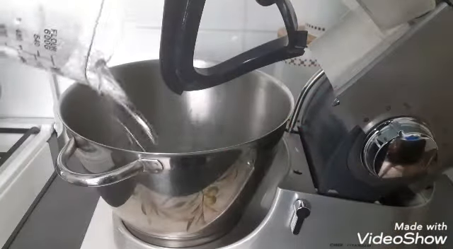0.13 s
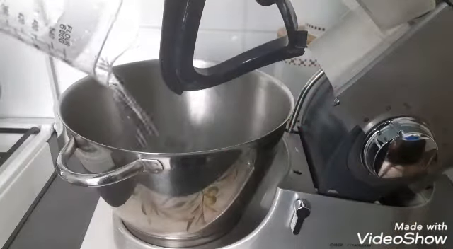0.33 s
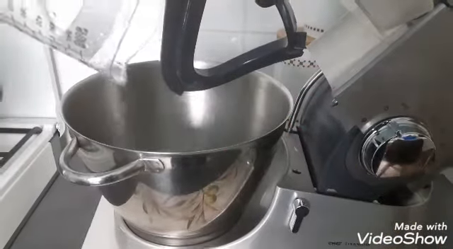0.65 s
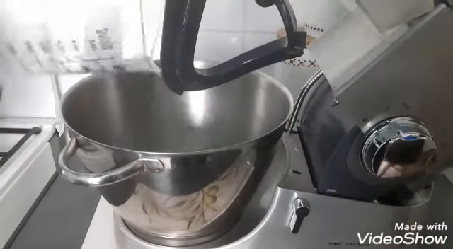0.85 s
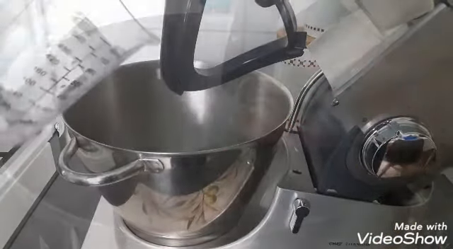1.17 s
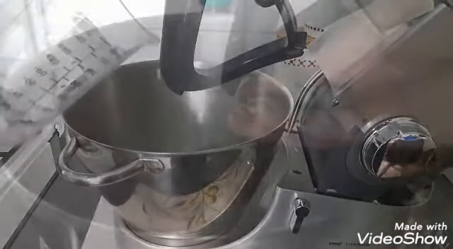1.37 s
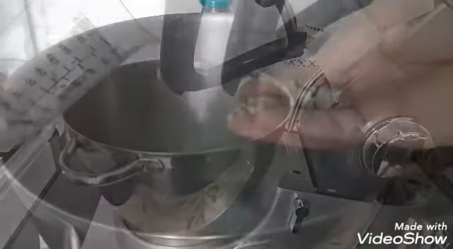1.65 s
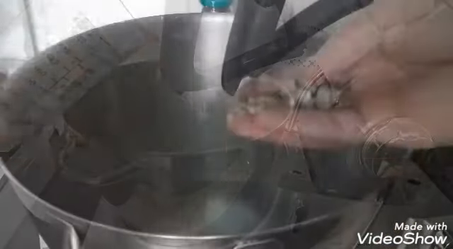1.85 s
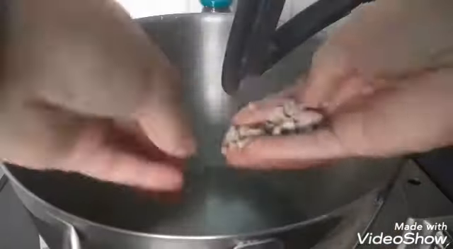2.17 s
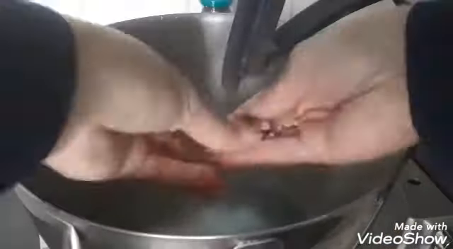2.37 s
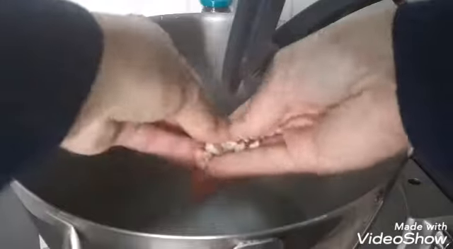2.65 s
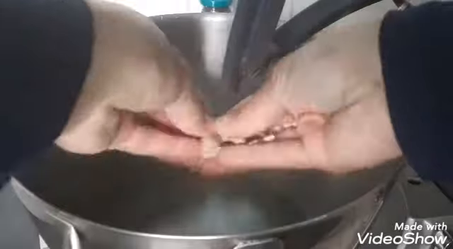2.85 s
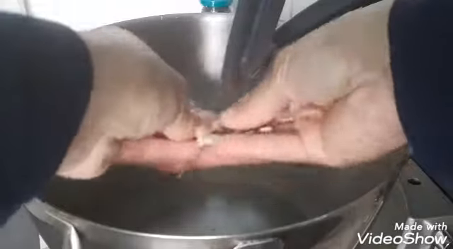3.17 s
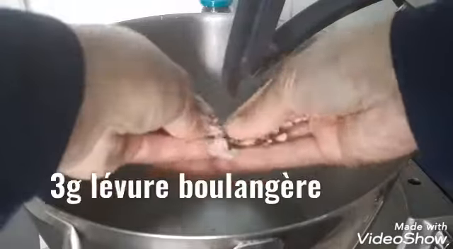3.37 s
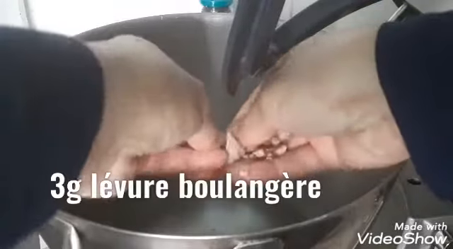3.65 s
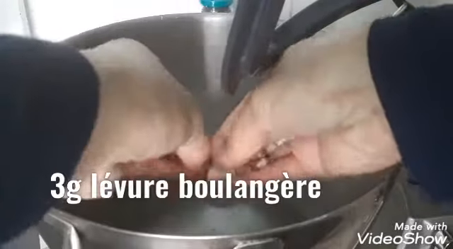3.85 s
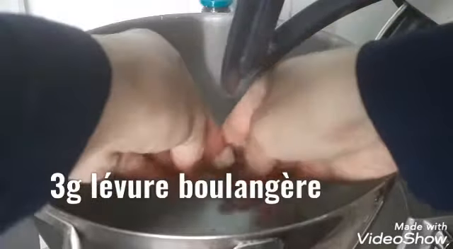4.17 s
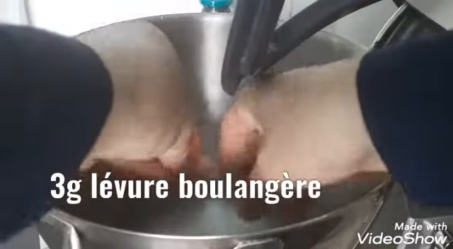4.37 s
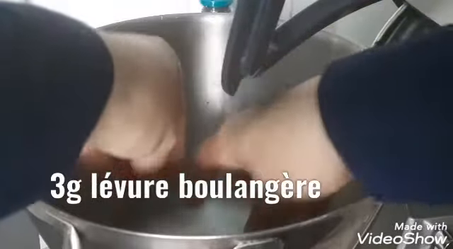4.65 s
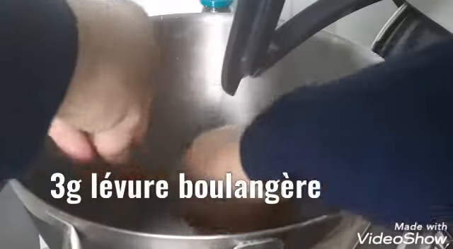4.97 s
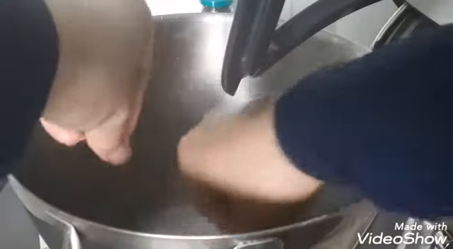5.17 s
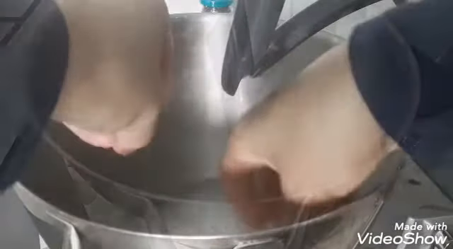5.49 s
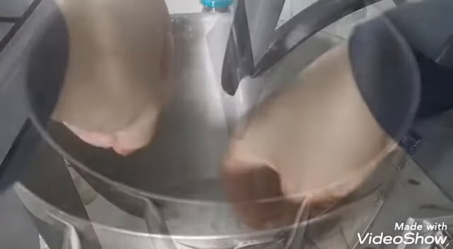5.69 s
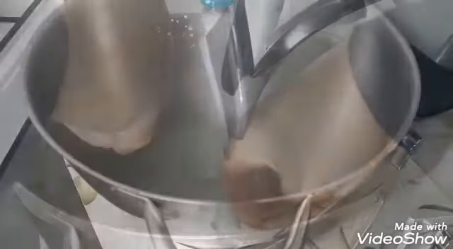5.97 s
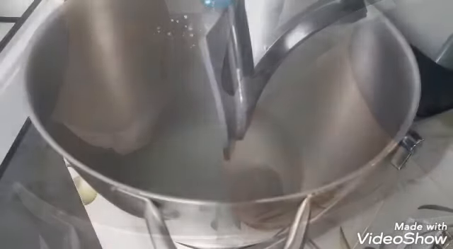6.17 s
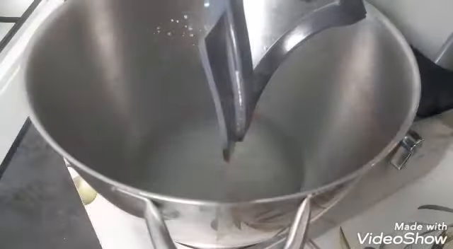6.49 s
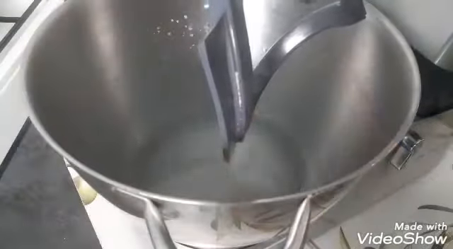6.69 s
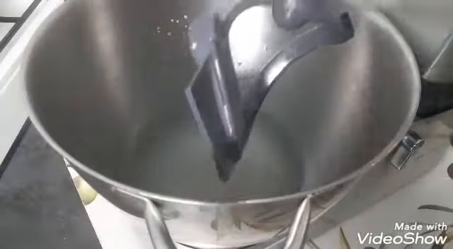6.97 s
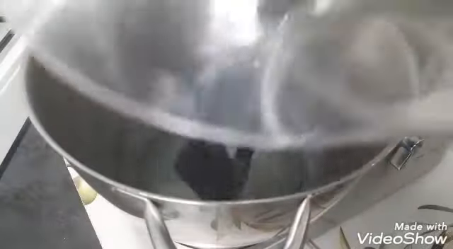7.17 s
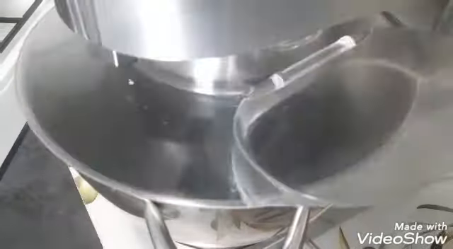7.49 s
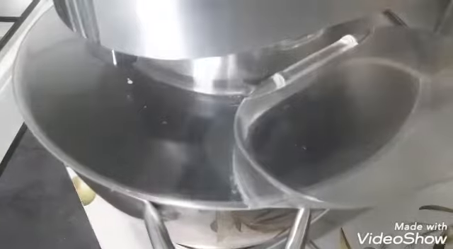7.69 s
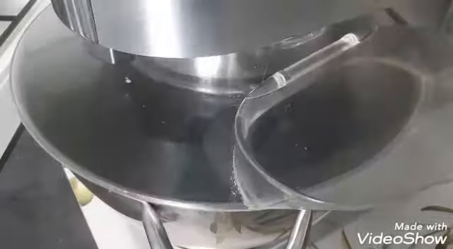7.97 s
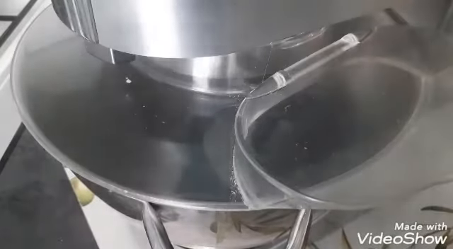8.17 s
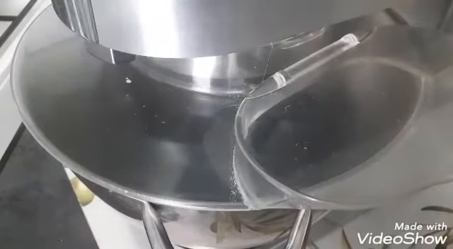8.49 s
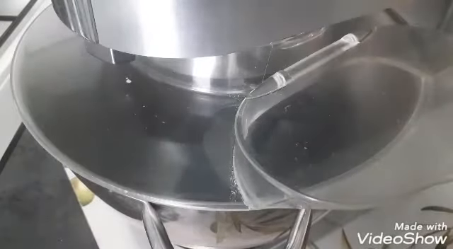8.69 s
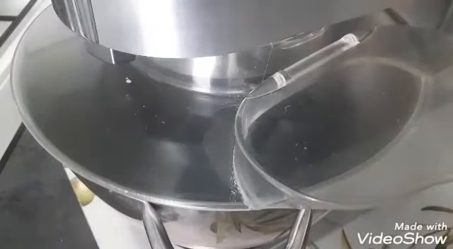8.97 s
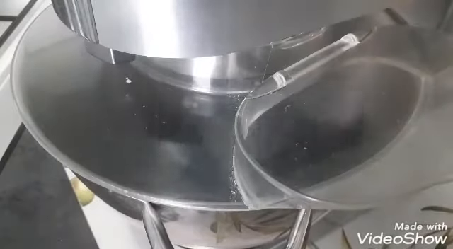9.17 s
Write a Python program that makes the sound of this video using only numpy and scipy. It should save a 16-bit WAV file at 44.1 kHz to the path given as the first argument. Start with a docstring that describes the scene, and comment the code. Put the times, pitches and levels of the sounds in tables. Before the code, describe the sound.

Quiet kitchen hum with thinning water and tiny crumb ticks, then a scraping mixer head slams locked, a switch clicks and the motor whines, sloshing water.

```python
"""Stand mixer over water and yeast

A kitchen hums as filtered noise and a steady tone, joined later by a low mains drone. Water fizzes into a steel
bowl as random clicks; fingers rub and tick as grains and short bursts, crumbs strike steel modes or trap chirping
bubbles. The head's hinge scrapes by stick and slip and groans, its latch knocks excite decaying modes, and the
switch snaps as a resonant burst. The motor whines on multiples of its rotor rate, rumbles and rattles, and its
hook stirs the water."""
import sys
import numpy as np
from scipy import signal
from scipy.fft import rfft, irfft
from scipy.io import wavfile
from scipy.ndimage import uniform_filter1d

SR = 44100
rng = np.random.default_rng(int(sys.argv[2]) if len(sys.argv) > 2 else 0)


def master(y):
    """Save y as 16-bit WAV."""
    cut = np.clip(np.atleast_2d(y).T, -1, 1)
    pcm = np.round(cut * 32767)  # scale
    wavfile.write(sys.argv[1], SR, pcm.astype(np.int16))


N = 411894
TIME = np.arange(N) / SR
AGE = TIME[:SR]  # time since a blow, one second long
MAINS_HZ = 50.05
CUT_FROM_S, CUT_TO_S = 5.338, 5.372  # short silence between two backgrounds


def undb(db):
    """Level to amplitude ratio: 20 dB is a factor of ten."""
    return 10 ** (np.asarray(db) / 20)


def unit(x):
    """Normalisation to an rms of 1."""
    return x / np.sqrt(np.mean(x ** 2))


def noise():
    """White noise: equal power at all frequencies."""
    return rng.standard_normal(N)


def walk(rate):
    """Band-limited fluctuation: random values, rate a second, smoothed to a spread near 1."""
    hold = max(int(SR / rate), 1)
    steps = np.repeat(rng.standard_normal(N // hold + 1), hold)
    return 1.25 * uniform_filter1d(steps, hold)[:N]


def ramp(start, length):
    """Linear onset from 0 to 1."""
    return np.clip((TIME - start) / length, 0, 1)


def humps(rows):
    """Gaussian envelopes, summed, from rows of t/s, level/dB, width/s."""
    return sum(undb(db) * np.exp(-.5 * ((TIME - s) / width) ** 2) for s, db, width in rows)


def fade(t60):
    """Exponential decay: 60 dB are lost in t60 seconds."""
    return np.exp(-np.log(1000) * AGE / t60)


def burst(t60):
    """Impulsive excitation: noise that decays exponentially."""
    return rng.standard_normal(SR) * fade(t60)


def grains(rate, spread):
    """Poisson impulses, rate a second: exponentially spread levels make a few much larger than the rest."""
    strikes = rng.random(N) < rate / SR
    sizes = undb(spread * np.minimum(rng.exponential(size=N), 5))
    return unit(strikes * np.sign(noise()) * sizes)


def colour(x, points):
    """Minimum-phase filter through points of f/Hz, level/dB, with a steep skirt below the lowest."""
    hz, db = np.transpose(points)
    octave = np.log2(np.maximum(np.fft.rfftfreq(8192, 1 / SR), 1))
    skirt_db = np.clip(24 * (np.log2(hz[0]) - octave), 0, 60)
    gain_db = np.interp(octave, np.log2(hz), db) - skirt_db
    # folding the cepstrum onto positive time makes the response causal
    cepstrum = irfft(np.log(undb(gain_db)))
    half = len(cepstrum) // 2
    cepstrum[1:half] *= 2
    cepstrum[half + 1:] = 0
    response = irfft(np.exp(rfft(cepstrum)))
    return signal.fftconvolve(x, response)[:len(x)]


def band(x, hz, width):
    """Single resonance: a two-pole peak with gain 1 at its centre."""
    b, a = signal.iirpeak(min(hz, .45 * SR), hz / min(width, .3 * SR), fs=SR)
    return signal.lfilter(b, a, x + 1e-18)  # the offset keeps the filter state from underflowing


def resonate(x, peaks):
    """Parallel resonators, each doubled for steep flanks and holding its own share of the power."""
    total = 0
    for hz, width, db in peaks:
        once = band(x, hz, 1.37 * width)
        total = total + undb(db) * unit(band(once, hz, 1.37 * width))
    return unit(total)


def ring(modes, blur=0):
    """Modal decay: struck partials, each widened by phase drift of blur times its frequency."""
    total = 0
    for hz, db, t60 in modes:
        drift = np.cumsum(rng.standard_normal(SR)) * np.sqrt(2 * np.pi * blur * hz / SR)
        total = total + undb(db) * fade(t60) * np.sin(2 * np.pi * hz * AGE + drift)
    return total


def tone(phase):
    """Pure tone of rms 1 at a given phase."""
    return np.sqrt(2) * np.sin(phase)


def add(out, s, db, sound):
    """Superposition: a sound joins at a time, scaled to a peak level."""
    i = int(s * SR)
    out[i:i + len(sound)] += (undb(db) * sound / np.abs(sound).max())[:N - i]


def scatter(t60):
    """Dense reflections: decaying noise with its spectrum levelled."""
    spectrum = rfft(burst(t60))
    return irfft(spectrum / uniform_filter1d(np.abs(spectrum), size=50))[:SR // 2]


def place(x, wet_db, t60, lead_ms):
    """Interaural lag and reverberation: the left port leads, and each port has its own scattered tail."""
    lag = int(lead_ms * SR / 1000)
    out = np.array([x, np.pad(x, (lag, 0))[:N]])
    for side in out:
        delayed = np.pad(scatter(t60), (SR // 900, 0))
        tail = colour(delayed, [(520, -2.5), (3000, -2.5), (15000, -5.5)])
        side += undb(wet_db) * signal.fftconvolve(x, tail / np.linalg.norm(tail))[:N]
    out[1] += (undb(-3) - 1) * band(out[1], 1100, 2100)  # the right port is shaded in the mids
    return out / np.sqrt(1 + undb(2 * wet_db) / 2)


def diffuse(rate, spread, points):
    """Partial coherence: crackle scattered by the bowl, half shared and half separate at the two ports."""
    shared, left, right = (unit(colour(grains(rate, spread), points)) for _ in range(3))
    return (np.array([shared, np.roll(shared, 12)]) + np.array([left, right])) / np.sqrt(2)


# spectrum of the kitchen air (f/Hz, level/dB)
AIR_COLOUR = [(18, -50), (30, -29.5), (48, -13.5), (102, -10.5), (136, -14), (205, -12.5), (260, -12),
              (346, -8), (485, -14), (538, -18.5), (640, -28.5), (850, -26), (1150, -33), (1780, -25.5),
              (2700, -36), (3070, -41), (15000, -45.5)]
# resonances of a distant appliance hum (f/Hz, width/Hz, level/dB)
HUM_PEAKS = [(111.5, 19, 0), (225.7, 66, 1), (291.9, 22, 0), (337, 26, -1), (1680, 180, -13.5),
             (2170, 260, -18)]


def kitchen():
    """Stationary background: hum alike at both ports over diffuse air; a mains drone joins after the cut."""
    later = ramp(CUT_FROM_S, .03)
    air = unit(colour(noise(), AIR_COLOUR)) * undb(-60.5 - 1.5 * later)
    hum = resonate(noise(), HUM_PEAKS) * undb(-55.5 - 1.5 * later)
    fan = tone(2 * np.pi * 343 * TIME + 0.61 * walk(25)) * undb(-61)
    drone = tone(2 * np.pi * MAINS_HZ * TIME + .3 * walk(12)) * undb(-67.5) * later
    width_colour = [(40, -1), (330, 5.5), (700, -10.5), (1800, -3), (3500, -21), (15000, -25.5)]
    width = unit(colour(noise(), width_colour)) * undb(-64 - 1.5 * later)
    return air + hum + fan + drone + width * np.array([[1], [-1]])  # opposite signs widen the air


# spectrum of the bursting bubbles (f/Hz, level/dB)
FIZZ_COLOUR = [(1760, -69), (3000, -3.5), (5200, 3.5), (7000, 5.5), (9000, 9.5), (10300, 2), (12400, 5),
               (15500, -5)]
# last dribbles from the jug (t/s, level/dB, width/s)
LAST_DRIBBLES = [(1.245, -66, 0.018), (1.37, -70, 0.031)]
# hiss on the bare steel while the jug is steepest (t/s, level/dB, width/s)
STEEL_SPRAY = [(0.22, -65, 0.1)]
# spectrum of that hiss (f/Hz, level/dB)
STEEL_SPRAY_COLOUR = [(3200, -28), (4600, 4), (7500, -1), (10000, -9), (15000, -10)]
# spectrum of the first splash (f/Hz, level/dB)
FIRST_SPLASH_COLOUR = [(100, -10), (390, 4.5), (600, -13), (900, -11.5), (1140, -25), (1720, -13),
                       (2460, -28), (5000, -29), (7800, -55)]
# the pour holds its level, then thins out as the jug is tipped back
POUR_DB, TIP_BACK_S, THINNING_DB_PER_S = -62.5, 0.28, 17


def stream():
    """Flow noise as many small impulses: a splash, hiss on the steel and fizz of bursting bubbles."""
    flow = undb(POUR_DB - THINNING_DB_PER_S * np.maximum(TIME - TIP_BACK_S, 0)) + humps(LAST_DRIBBLES)
    fizz = diffuse(6000, 3.6, FIZZ_COLOUR) * flow
    fizz += diffuse(9000, 2.3, STEEL_SPRAY_COLOUR) * humps(STEEL_SPRAY)
    splash = np.zeros(N)
    swelling = burst(0.19) * (1 - fade(0.038))
    add(splash, .006, -35, colour(swelling, FIRST_SPLASH_COLOUR))
    return fizz + place(splash, wet_db=-4, t60=0.062, lead_ms=0.26)


def bubble(hz, t60, rise):
    """Volume resonance of a trapped bubble, rising in pitch as it nears the surface."""
    age = AGE[:SR // 4]
    phase = 2 * np.pi * hz * np.cumsum(1 + rise * np.minimum(age / t60, 1)) / SR
    return np.sin(phase) * fade(t60)[:len(age)] * (1 - np.exp(-age * hz / 3))


# spectrum of the rubbing fingers (f/Hz, level/dB)
FINGER_COLOUR = [(1180, -51), (2000, 5), (4320, -2.5), (8000, 2), (10200, -3), (12400, -0.5), (15500, -7.5)]
# firmer squeezes of the yeast (t/s, level/dB, width/s)
YEAST_SQUEEZES = [(1.87, -69, 0.053), (2.11, -67, 0.16), (3.47, -68.5, 0.16), (3.505, -56, 0.0073),
                  (4.06, -77, 0.079), (4.49, -63, 0.02), (4.5, -71, 0.1), (5.02, -82, 0.13),
                  (5.28, -75, 0.041)]
# the bulk of the crumbs pattering on the water (t/s, level/dB, width/s)
CRUMB_PATTER = [(4.025, -57, 0.021), (4.058, -53.5, 0.011), (4.112, -56.5, 0.018)]
# spectrum of the patter (f/Hz, level/dB)
CRUMB_PATTER_COLOUR = [(700, -2), (1700, 2), (4200, 1), (5500, -7), (12000, -18)]
# clearest ticks of crumbs, fingers and handling, the last ones on the dial (t/s, peak level/dB, brightest f/Hz)
HANDLING_TICKS = [(1.849, -36.5, 3500), (1.964, -33.5, 7900), (2.074, -30, 9300), (2.537, -38, 9000),
                  (2.749, -40, 9510), (3.064, -35, 11000), (3.1773, -38, 5640), (3.403, -36, 2800),
                  (3.514, -23.5, 5100), (3.674, -34.5, 3480), (4.019, -34, 9000), (4.046, -44, 13000),
                  (4.0936, -31, 12500), (4.149, -39, 7400), (4.3002, -38.5, 8200), (4.388, -50, 12000),
                  (4.478, -36, 7000), (4.791, -39.5, 8800), (4.86, -37, 13200), (5.15, -39.5, 6900),
                  (6.815, -45, 3540), (7.32, -63, 1100), (7.636, -45, 1500), (7.694, -43.5, 2940),
                  (7.7375, -48.5, 3350)]
# crumbs that strike the steel (t/s, ring peak level/dB, crack peak level/dB)
STEEL_PINGS = [(3.095, -36, -27), (3.0985, -29, -30), (3.123, -32.5, -47), (4.477, -44, -55)]
# modes of the steel bowl (f/Hz, level/dB, t60/s)
BOWL_MODES = [(3133, -1.5, 0.26), (3210, -6, 0.61), (3400, 1, 0.31), (3600, -6, .1), (3698, -11, 0.26),
              (3784, -5, 0.12), (4270, -10, 0.24), (4100, -8, 0.19), (4624, 2, 0.11), (4820, -8, 0.12),
              (5260, -9, .2), (5534, -15, 0.25), (5900, -9, 0.24), (6160, -4, .16), (7000, -15, .2),
              (8200, -12, 0.04)]
# bubbles of larger crumbs in the water (t/s, peak level/dB, f/Hz, t60/s, rise in pitch as a share)
CRUMB_PLOPS = [(3.094, -46.5, 1126, 0.038, 0.056), (3.405, -50.5, 2980, 0.087, 0.03),
               (3.408, -55, 3290, 0.081, .03), (3.517, -39.5, 687, 0.23, 0.05),
               (3.514, -47.5, 1570, 0.08, .06), (3.517, -50, 1684, .07, .06),
               (4.0005, -43.5, 4200, 0.0062, 0.34), (4.007, -47.5, 1680, 0.052, .03),
               (4.03, -49, 2560, 0.012, .1), (4.032, -46, 3480, 0.0068, .1),
               (4.046, -42.5, 3330, 0.022, 0.092), (4.0506, -45, 4200, 0.0055, .1),
               (4.052, -47, 1800, 0.0059, .3), (4.0835, -51, 3750, 0.011, .1),
               (4.104, -42.5, 2300, 0.0067, 0.57), (4.108, -45, 3260, 0.022, 0.054),
               (4.151, -48, 1404, 0.031, 0.11), (4.175, -48.5, 3300, 0.0092, .1),
               (4.3, -55, 2470, 0.069, .05), (4.36, -62, 3660, 0.049, .03)]
RUB_FROM_S, RUB_TO_S, RUB_DB = 1.3, 5.33, -75
BOWL_BLUR = .007  # width of a mode as a share of its frequency


def yeast_and_ticks():
    """Friction and impact: fingers rub and tick, at last on the dial; crumbs ring the bowl or trap bubbles."""
    effort = undb(RUB_DB) * ((TIME > RUB_FROM_S) & (TIME < RUB_TO_S)) + humps(YEAST_SQUEEZES)
    rub = diffuse(700, 0.81, FINGER_COLOUR) * effort * undb(2 * walk(26))
    rub += diffuse(1500, 2.5, CRUMB_PATTER_COLOUR) * humps(CRUMB_PATTER)
    clicks, rings, plops = np.zeros((3, N))
    for s, db, hz in HANDLING_TICKS:
        add(clicks, s, db, band(burst(0.0025) + 0.11 * burst(0.026), hz, 0.87 * hz))
    crack_peaks = [(5020, 2000, 12), (4100, 330, 9.5), (7700, 980, -6.5)]
    for s, ring_db, crack_db in STEEL_PINGS:
        add(rings, s, ring_db, ring(BOWL_MODES, BOWL_BLUR))
        add(clicks, s, crack_db, resonate(burst(0.023) + .25 * burst(0.059), crack_peaks))
    for s, db, hz, t60, rise in CRUMB_PLOPS:
        add(plops, s, db, bubble(hz, t60, rise))
    ringing = place(rings, wet_db=-8, t60=0.19, lead_ms=.05)
    ticking = place(clicks, wet_db=1.5, t60=0.21, lead_ms=.23)
    bubbling = place(plops, wet_db=-4, t60=.16, lead_ms=.06)
    return rub + ringing + ticking + bubbling


# hands nudging the bowl (t/s, peak level/dB)
BOWL_NUDGES = [(3.098, -41.5), (3.985, -38.5), (4.15, -44), (4.785, -40), (5.30, -37.5)]
# dull resonances of the nudged bowl (f/Hz, width/Hz, level/dB)
NUDGE_PEAKS = [(111.3, 19, 0), (285, 97, 0), (790, 220, -12.5)]
# faint sleeve rustles as the lid is fetched (t/s, level/dB, width/s)
SLEEVE_RUSTLES = [(6.96, -73, 0.047), (7.09, -72, 0.054)]
# spectrum of the rustles (f/Hz, level/dB)
SLEEVE_COLOUR = [(1900, -2), (2900, 4), (3400, -11), (4000, -4), (5000, -25), (12000, -30)]


def hands():
    """Soft impact and friction: dull bumps on the bowl, a tiny narrow-band squeak and rustling sleeves."""
    out = np.zeros(N)
    for s, db in BOWL_NUDGES:
        add(out, s, db, resonate(burst(0.32), NUDGE_PEAKS))
    add(out, 5.775, -61, resonate(burst(0.1), [(2580, 40, 0)]))  # squeak
    rustling = diffuse(4000, 1.8, SLEEVE_COLOUR) * humps(SLEEVE_RUSTLES)
    return place(out, wet_db=-5, t60=0.32, lead_ms=0.18) + rustling


# spectrum of the rubbing hinge (f/Hz, level/dB)
SCRAPE_COLOUR = [(160, -30.5), (280, -19), (335, -0.5), (505, -16), (645, -10), (772, -19), (1160, -16.5),
                 (2240, -29.5), (3430, -32.5), (4240, -39), (9300, -47.5), (14000, -69.5)]
# resonances of the head's casing (f/Hz, width/Hz, level/dB)
CASING_PEAKS = [(2520, 140, 0.5), (3400, 150, 4.5)]
# the hinge catches and groans aloud (t/s, level/dB, width/s)
HINGE_CATCHES = [(6.262, -35, 0.012), (6.307, -20, 0.0093)]
# the hinge starts to rub, then rubs harder and harder until the head meets its latch
HINGE_FROM_S, HINGE_ATTACK_S, HINGE_DB, PRESS_DB_PER_S = 5.953, 0.16, -36, 35
GROAN_HZ, GROAN_DB = 332.4, -47  # the groan grows with the same pressure
JUDDER_HZ, JUDDER_DB = 62.3, 3


def hinge():
    """Stick-slip friction: slips scrape with a growing judder while a wavering tone groans."""
    scrape = colour(grains(5000, 1.6), SCRAPE_COLOUR)
    scrape += sum(undb(db) * band(scrape, hz, width) for hz, width, db in CASING_PEAKS)
    latch_s = LATCH_KNOCKS[0][0]
    pressing_s = np.clip(TIME, HINGE_FROM_S, latch_s) - HINGE_FROM_S - HINGE_ATTACK_S
    attack = ramp(HINGE_FROM_S, HINGE_ATTACK_S) ** 2
    pressure = attack * undb(PRESS_DB_PER_S * pressing_s) * (1 - ramp(latch_s, .02))
    judder = np.sin(2 * np.pi * np.cumsum(JUDDER_HZ * (1 + 0.1 * walk(40))) / SR)
    roughness_db = JUDDER_DB * judder * ramp(HINGE_FROM_S, 0.3)
    scrape = unit(scrape) * pressure * undb(HINGE_DB + roughness_db)
    phase = 2 * np.pi * np.cumsum(GROAN_HZ * (1 + 0.012 * walk(120))) / SR
    groan = tone(phase) * (pressure * undb(GROAN_DB) + humps(HINGE_CATCHES)) * undb(1.2 * walk(70))
    return place(groan, wet_db=-16, t60=.15, lead_ms=.2) + place(scrape, wet_db=0, t60=0.11, lead_ms=0.19)


# blows of the head on its latch (t/s, crack level/dB, thud peak level/dB)
LATCH_KNOCKS = [(6.36, -5.5, -21), (6.3752, -6, -21), (6.380, -4, -9.5), (6.3861, -6.5, -17.5),
                (6.390, -18, -11), (6.409, -27, -18.5)]
# spectrum of the first metal contact (f/Hz, level/dB)
CONTACT_COLOUR = [(900, -5.5), (3400, 0.5), (4500, -4.5), (7000, -1.5), (10500, -8.5), (15500, 0.5)]
# spectrum of the clatter (f/Hz, level/dB)
CLATTER_COLOUR = [(60, -48), (90, -26.5), (206, -0.5), (328, -7.5), (509, -22.5), (757, -17.5),
                  (864, -17.5), (2090, -20), (2430, -24.5), (3390, -19.5), (4820, -33.5), (5750, -24.5),
                  (15500, -38.5)]
# modes of the mixer's body (f/Hz, level/dB, t60/s)
BODY_MODES = [(110, -3, 0.3), (160.3, -4.5, 0.08), (200, 5.5, 0.085), (351.3, 0, 0.28), (405, -3.5, 0.18),
              (450, -12.5, 0.54), (673, -15, 0.14), (760, -19, 0.24), (997, -8, 0.1), (1320, -15, 0.083),
              (1567, -14, 0.15), (2120, -15.5, .15), (3350, -24, 0.2), (3466, -18.5, .15)]
# spectrum of bowl and casing shivering on (f/Hz, level/dB)
SHIVERING_COLOUR = [(400, -2.5), (1000, -1.5), (2200, -4), (3400, -3.5), (4600, -11.5), (6500, -10),
                    (10000, -17), (15500, -27.5)]
# close, beating modes of the locked head (f/Hz, level/dB, t60/s)
LOCKED_MODES = [(283.4, -1, 0.94), (262, -15.5, 0.21), (302, -14.5, 0.69)]
SNAP_DB, CLATTER_DB = -4, -1.5  # peaks relative to each crack level
BODY_BLUR = .012  # width of a mode as a share of its frequency


def latch():
    """Repeated impact: each blow cracks and excites the body's modes; the head rings on with beats."""
    cracks, thuds, ringing = np.zeros((3, N))
    for s, crack_db, thud_db in LATCH_KNOCKS:
        add(cracks, s, crack_db + SNAP_DB, colour(burst(.011), CONTACT_COLOUR))
        add(cracks, s, crack_db + CLATTER_DB, colour(burst(.05), CLATTER_COLOUR))
        add(thuds, s, thud_db, ring(BODY_MODES, BODY_BLUR))
    main_s = LATCH_KNOCKS[2][0]
    add(cracks, main_s, -21.5, colour(burst(0.47), SHIVERING_COLOUR))
    add(ringing, main_s, -17, ring(LOCKED_MODES))
    add(thuds, main_s, -17, resonate(burst(0.33), [(150, 168, 0)]))  # the worktop takes the weight
    near = place(ringing, wet_db=-16, t60=.15, lead_ms=.2) + place(cracks, wet_db=3, t60=.08, lead_ms=.19)
    return near + place(thuds, wet_db=-0.5, t60=0.26, lead_ms=.2)


# resonances of the switch (f/Hz, width/Hz, level/dB)
SWITCH_PEAKS = [(330, 170, -8), (750, 270, 3.5), (1880, 860, 9.5), (3810, 390, 0.5), (5470, 350, 10.5),
                (8200, 4600, 8)]
SWITCH_S, SWITCH_DB = 7.839, -20.5


def switch():
    """Snap excitation: a plastic dial clicks through its resonances, its spring rings briefly."""
    out = np.zeros(N)
    add(out, SWITCH_S, SWITCH_DB, resonate(burst(0.017) + 0.052 * burst(0.091), SWITCH_PEAKS))
    add(out, SWITCH_S, -41, band(burst(0.38), 5260, 1000))
    add(out, SWITCH_S, -42, band(burst(0.48), 220, 190))  # the housing answers dully
    return place(out, wet_db=-1.5, t60=0.2, lead_ms=0)


# lines of the gear whine (rotor order, rms level/dB before wavering)
WHINE_LINES = [(4, -44.5), (8, -50), (10, -60), (12, -58), (16, -69), (18, -77), (20, -54.5), (22, -70),
               (24, -51.5), (28, -58), (30, -66), (32, -62), (34, -80), (36, -61), (40, -64), (42, -71),
               (44, -66), (46, -66), (48, -81)]
# resonances of the gear cover that a passing line excites (f/Hz, width/Hz, level/dB)
COVER_PEAKS = [(4720, 170, 7), (6995, 115, 3)]
# lines of the winding buzz (multiple of the mains frequency, relative level/dB)
BUZZ_LINES = [(3, -46), (6, -38), (7, -55.5), (9, -49.5)]
TOOTH_PLAY = .14  # random play in radians, growing with the root of the order
BELT_ORDER, BELT_DB = 3.83, -36  # the toothed belt sings just under the gear mesh
DRUM_ORDER, DRUM_DB = 2 / 3, -37  # drumming below the rotor's rate; level relative to the load gain
# the motor takes up its load: gain of buzz and drumming before and after
LOAD_FROM_S, LOAD_RISE_S, IDLE_BUZZ_DB, LOADED_BUZZ_DB = 8.62, 0.34, -27, 6.5


def whine(spin, turn):
    """Order tones: gear teeth and belt sing in step with the rotor; the windings buzz on mains harmonics."""
    gears = 0
    for order, db in WHINE_LINES:
        play = TOOTH_PLAY * np.sqrt(order) * walk(70)
        gears = gears + tone(order * turn + play) * undb(db + 1.3 * walk(12) + 1.2 * walk(150))
    gears = gears + sum(undb(db) * band(gears, hz, width) for hz, width, db in COVER_PEAKS)
    belt = tone(BELT_ORDER * turn + 0.75 * walk(70)) * undb(BELT_DB + 2.4 * walk(40))
    belt += tone(2 * BELT_ORDER * turn + 0.47 * walk(90)) * undb(BELT_DB - 18.5)
    mains = 2 * np.pi * MAINS_HZ * TIME
    buzz = sum(tone(k * mains) * undb(db + 0.75 * walk(7.2)) for k, db in BUZZ_LINES)
    drum = tone(DRUM_ORDER * turn + 0.49 * walk(25)) * undb(DRUM_DB)
    load_db = IDLE_BUZZ_DB + (LOADED_BUZZ_DB - IDLE_BUZZ_DB) * ramp(LOAD_FROM_S, LOAD_RISE_S)
    singing = spin ** 60  # teeth only sing near full speed
    low = belt * singing + (buzz + drum) * undb(load_db)
    return place(gears * singing, wet_db=1, t60=.08, lead_ms=0) + place(low, wet_db=-12, t60=.12, lead_ms=0)


# resonances of the housing (f/Hz, width/Hz, level/dB)
HOUSING_PEAKS = [(109.5, 29, -14.5), (151, 28, -11.5), (208.4, 50, 0.5), (225, 29, -0.5), (299.1, 28.6, 0),
                 (341, 24, 0.5), (440, 10, -20)]
# strokes of the hook (t/s, swish level/dB, swish width/s, shove on the housing level/dB)
HOOK_STROKES = [(8.225, -45, 0.067, -34), (8.42, -54, 0.031, -31.5), (8.615, -42.5, 0.017, -61),
                (8.82, -41.5, 0.021, -56), (9.005, -43.5, 0.022, -29), (9.194, -36, 0.02, -27)]
MOTOR_ON_S = 8.052
SHOVE_WIDTH_S = 0.021
RUMBLE_DB, LOADED_RUMBLE_DB = -26, 0.5  # level, and what the load adds
JOLT_DB, JOLT_DELAY_S, JOLT_WIDTH_S = -30, 0.14, 0.055  # the housing shudders as the motor starts


def rumble():
    """Forced vibration: random knocks drive the housing, harder at the start and with each stroke."""
    shoves = humps([(s, db, SHOVE_WIDTH_S) for s, _, _, db in HOOK_STROKES])
    steady = undb(RUMBLE_DB + LOADED_RUMBLE_DB * ramp(LOAD_FROM_S, LOAD_RISE_S))
    jolt = humps([(MOTOR_ON_S + JOLT_DELAY_S, JOLT_DB, JOLT_WIDTH_S)])
    return resonate(grains(900, 1.7), HOUSING_PEAKS) * (steady + shoves + jolt) * ramp(MOTOR_ON_S, 0.023)


# resonances of the gearbox (f/Hz, width/Hz, level/dB)
GEARBOX_PEAKS = [(580, 150, -5.5), (698, 116, -8.5), (974, 126, -7), (1166, 74, -6.5), (1405, 290, -8),
                 (1556, 220, -6), (1970, 260, -7), (2316, 116, -13.5)]
# spectrum of the brushes (f/Hz, level/dB)
BRUSH_COLOUR = [(260, -23.5), (450, -18), (871, -25), (1170, -9), (1840, -21.5), (2010, -20.5),
                (5290, -34.5), (8720, -34), (10200, -44), (13000, -34.5), (15000, -70)]
RATTLE_DB, RATTLE_WAVER_DB = -35, 2  # drive gain, and how far each gear resonance comes and goes
CHATTER_DB, CHATTER_HZ = 2.2, 70  # depth and rate of the loose gears' flutter


def rattle(spin, turn):
    """Modulated impacts: tooth knocks, stronger once a turn, excite the gearbox while the brushes rustle."""
    teeth = grains(300, 2.9) * (1 + .5 * np.sin(turn))
    gears = 0
    for peak in GEARBOX_PEAKS:
        gears = gears + resonate(teeth, [peak]) * undb(peak[2] + RATTLE_WAVER_DB * walk(30))
    brushes = unit(colour(grains(3000, 3.3), BRUSH_COLOUR)) * spin ** 5
    drive = ramp(MOTOR_ON_S, 0.0093) * undb(RATTLE_DB - 10 * (1 - ramp(MOTOR_ON_S, 0.2)))
    mixed = undb(-4.5) * unit(gears) + undb(-3.5) * brushes
    return mixed * drive * undb(CHATTER_DB * walk(CHATTER_HZ))


# spectrum of the hook's swish (f/Hz, level/dB)
HOOK_COLOUR = [(880, -22), (1500, -20), (1840, -2.5), (3780, -6), (4500, -21), (6240, -6), (15000, -21)]
# slaps of the hook on the water (t/s, peak level/dB, brightest f/Hz, t60/s)
WATER_SLAPS = [(8.166, -25, 330, .06), (8.205, -22.5, 625, 0.2), (8.305, -26, 900, .03),
               (8.562, -32, 5000, 0.044), (8.578, -20, 1300, 0.12), (8.596, -28.5, 2900, 0.062),
               (8.765, -26, 1670, 0.047), (8.819, -26, 2070, 0.036), (9.015, -26, 3800, 0.013),
               (9.177, -22, 4600, 0.026), (9.198, -35, 3000, 0.053)]
# air pulled under by the hook (t/s, peak level/dB, f/Hz, t60/s, rise in pitch as a share)
WATER_GURGLES = [(8.605, -28, 676, 0.045, 0.11), (8.776, -30, 1410, 0.028, 0.11),
                 (8.795, -29.5, 795, 0.027, 0.092), (8.828, -26.5, 613, 0.024, 0.1),
                 (8.86, -29, 914, 0.042, 0.22), (8.878, -26, 1144, 0.044, .15),
                 (9.177, -28.5, 3680, 0.053, 0.02)]


def stirred_water():
    """Turbulence and entrained air: the hook swishes, slaps the water and pulls bubbles under."""
    swish = diffuse(1700, 1.6, HOOK_COLOUR) * humps([row[:3] for row in HOOK_STROKES])
    water = np.zeros(N)
    for s, db, hz, t60 in WATER_SLAPS:
        add(water, s, db, resonate(grains(2500, 2.1)[:SR] * fade(t60), [(hz, 0.61 * hz, 0)]))
    for s, db, hz, t60, rise in WATER_GURGLES:
        add(water, s, db, bubble(hz, t60, rise))
    return swish + place(water, wet_db=0, t60=0.16, lead_ms=0)


# uneven speed of the rotor once spun up (t/s, f/Hz)
ROTOR_SPEED = [(8.27, 295), (8.33, 301), (8.43, 298.8), (8.485, 290.3), (8.55, 290), (8.61, 300.5),
               (8.66, 302), (8.75, 299.6), (8.83, 308), (8.91, 302), (8.99, 305.6), (9.1, 304),
               (9.18, 309.7), (9.24, 307), (9.33, 299.5)]
SPIN_UP_S = 0.052  # time constant


def motor():
    """Exponential run-up: the rotor's integrated speed gives the phase that gears and belt follow."""
    spin = 1 - np.exp(-np.maximum(TIME - MOTOR_ON_S, 0) / SPIN_UP_S)
    rotor_hz = uniform_filter1d(np.interp(TIME, *np.transpose(ROTOR_SPEED)), size=1000) * spin
    turn = 2 * np.pi * np.cumsum(rotor_hz * (1 + .001 * walk(250))) / SR
    body = place(rumble() + rattle(spin, turn), wet_db=3, t60=0.093, lead_ms=0)
    return whine(spin, turn) + stirred_water() + body


def scene():
    """Linear superposition of everything on the worktop."""
    return kitchen() + stream() + yeast_and_ticks() + hands() + hinge() + latch() + switch() + motor()


def record(dry):
    """Saturation and band limits: a short silence at a cut, rounded peaks, and loss of deep bass and top."""
    live = uniform_filter1d(1. * ((TIME < CUT_FROM_S) | (TIME > CUT_TO_S)), size=200)
    rounded = np.tanh(dry * live)
    heard = signal.sosfilt(signal.butter(2, 48, "high", fs=SR, output="sos"), rounded)
    return signal.sosfilt(signal.ellip(8, .2, 80, 15800, fs=SR, output="sos"), heard)


dry = scene()
out = record(dry)
master(out)
```